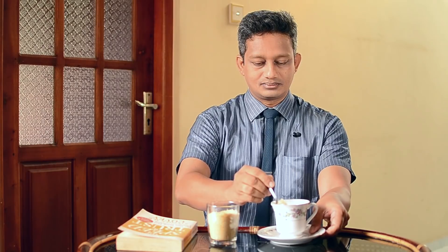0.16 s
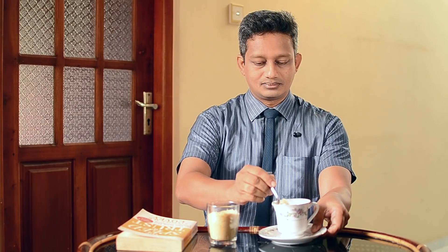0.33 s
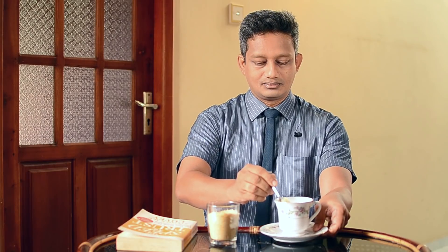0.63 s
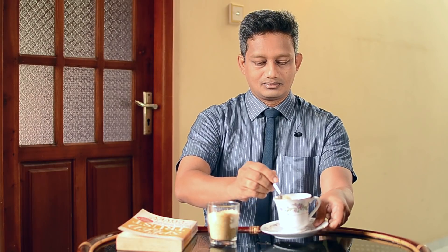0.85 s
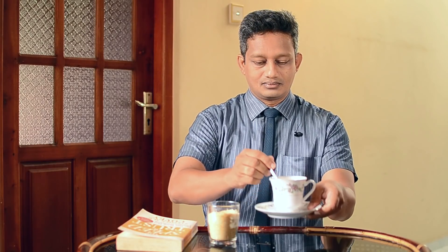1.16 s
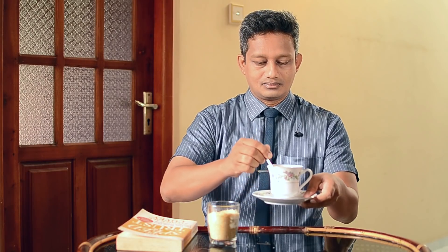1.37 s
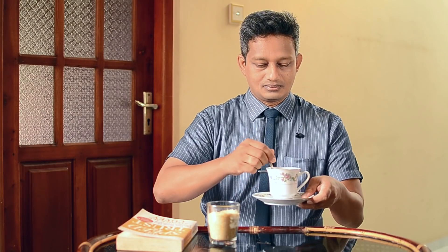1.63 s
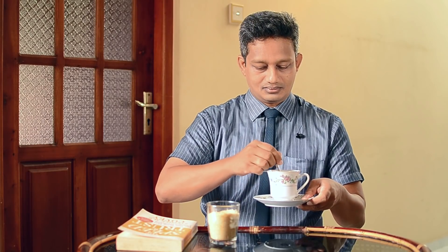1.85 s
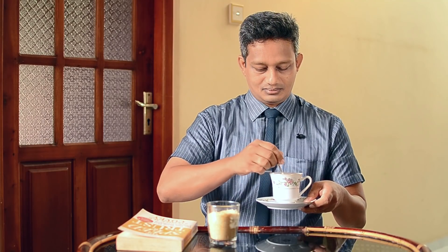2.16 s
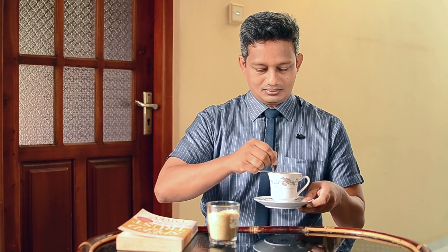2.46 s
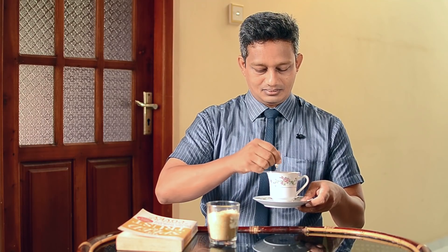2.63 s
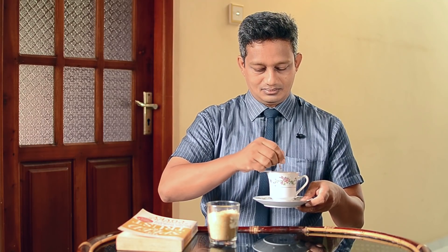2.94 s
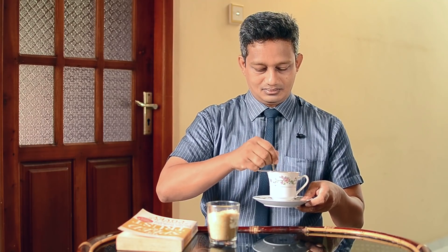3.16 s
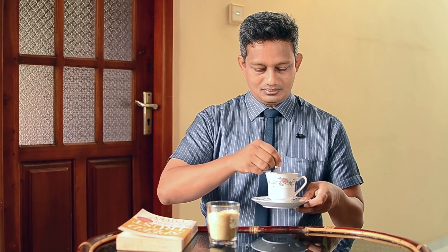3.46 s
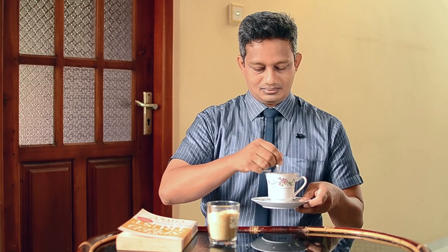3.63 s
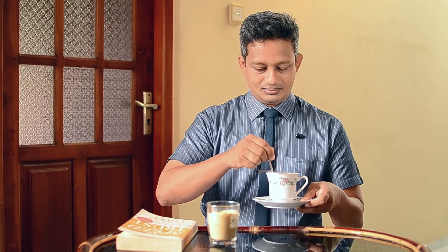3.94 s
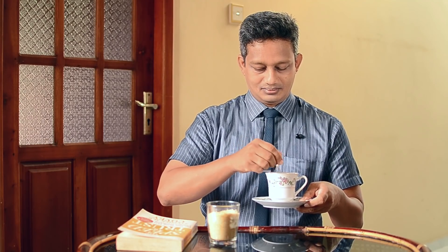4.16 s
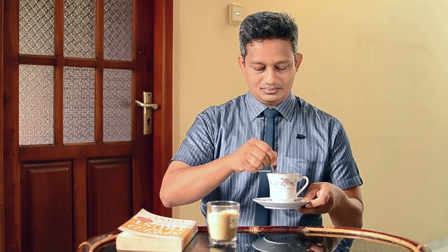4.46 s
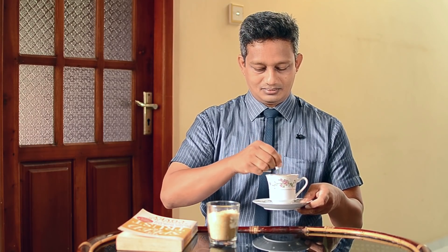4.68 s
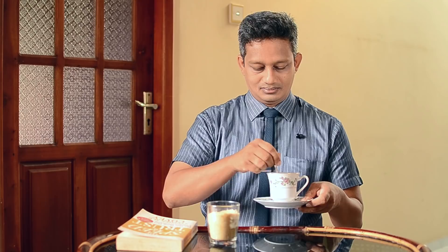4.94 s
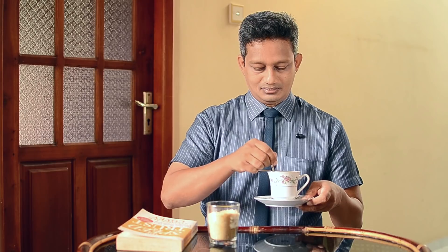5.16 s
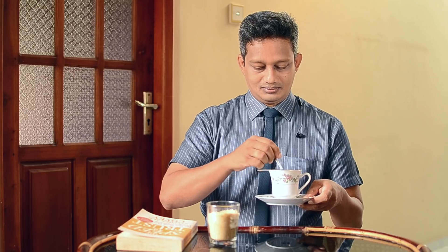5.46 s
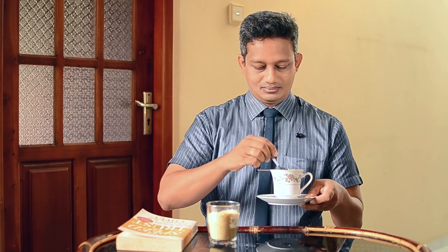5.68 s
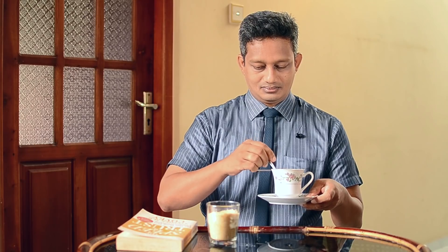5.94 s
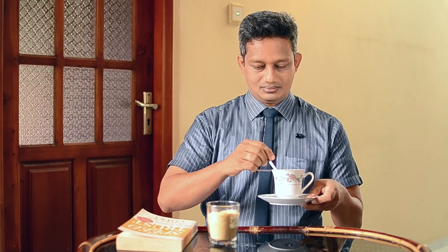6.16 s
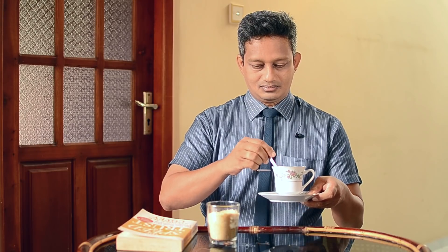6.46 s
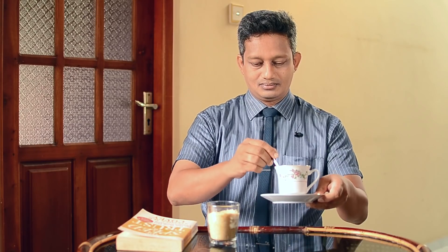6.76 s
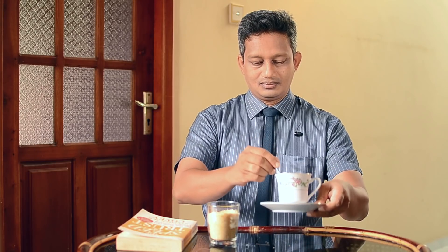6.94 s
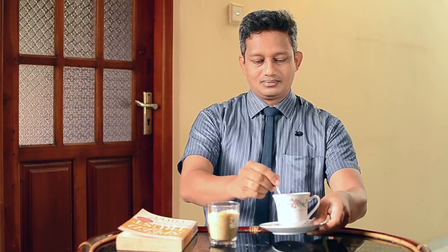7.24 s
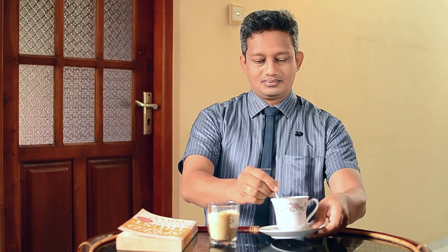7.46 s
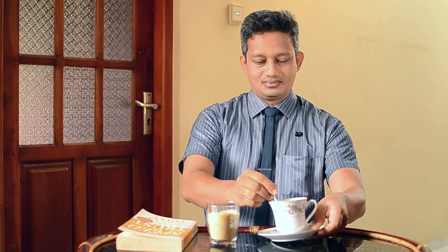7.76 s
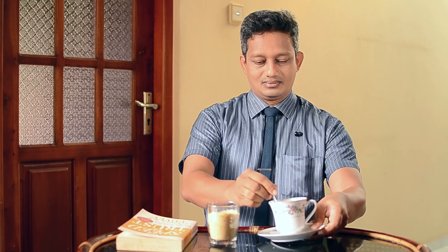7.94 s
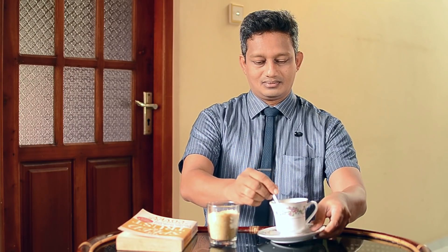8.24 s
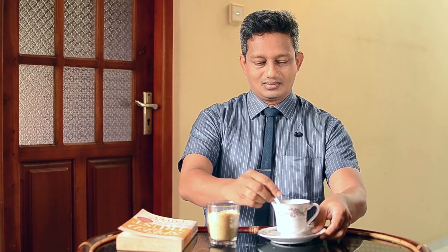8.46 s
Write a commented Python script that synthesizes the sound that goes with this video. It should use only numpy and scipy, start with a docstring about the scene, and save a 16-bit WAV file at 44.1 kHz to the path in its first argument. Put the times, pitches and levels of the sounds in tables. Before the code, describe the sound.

Close clip-on microphone in a small hard-walled room, slightly muffled at the top. Low room noise and faint chirps open, then a metal spoon taps and stirs in a china cup: irregular short rings, soft singing drags, small squeaks. The moving arm adds low, lumpy fabric bumps and rubs. After the strongest ringing clink, the stirring thins out, the saucer lands with one loud hard clack, and the spoon clinks lightly once more.

```python
"""Quiet room noise, faint chirps and soft shirt bumps come first; then a teaspoon stirs tea in a cup.
The steel spoon clinks on the porcelain (struck modes plus a dry tick) and slides along its wall
(noise-driven resonances), with a few squeaks (wobbling sines, like the chirps); near the end
the saucer knocks on the table (cracks plus struck modes). Cloth bumps and rubs a clip-on microphone
as the arm moves (wobbly low tones, dull noise). A small hard-walled room adds decaying reflections."""
import sys
import numpy as np
from scipy import signal
from scipy.fft import rfft, irfft
from scipy.io import wavfile
from scipy.ndimage import uniform_filter1d

SR = 44100
rng = np.random.default_rng(int(sys.argv[2]) if len(sys.argv) > 2 else 0)


def master(y):
    """Save y as 16-bit WAV."""
    cut = np.clip(np.atleast_2d(y).T, -1, 1)
    pcm = np.round(cut * 32767)  # scale
    wavfile.write(sys.argv[1], SR, pcm.astype(np.int16))


N = 379701  # length in samples
LEAD_S = 0.002  # silence ahead of the onset inside each contact burst

# spectrum of cloth on the microphone: pitch_hz [Hz], relative level_db [dB]
CLOTH_COLOUR = [(30, -23.5), (80, -12), (140, 6.5), (260, -7.5), (450, -27), (1000, -33)]


def amp(db):
    """Decibels to gain."""
    return 10 ** (np.asarray(db) / 20)


def unit(x):
    """Scales to rms 1."""
    return x / np.sqrt(np.mean(x ** 2) + 1e-20)


def read(points, hz):
    """Reads a table's value on a log-frequency axis."""
    f, value = np.transpose(points)
    return np.interp(np.log(hz + 1), np.log(f + 1), value)


def add(mix, s, sound):
    """Mixes a sound in at time s, in seconds."""
    part = mix[round(s * SR):][:len(sound)]
    part += sound[:len(part)]


def noise(colour, size):
    """Noise of rms 1 with the given spectrum."""
    hz = np.fft.rfftfreq(size, 1 / SR)
    white = rng.standard_normal(size)
    return unit(irfft(rfft(white) * amp(read(colour, hz)), size))


def smooth_noise(size, width):
    """Slow random drift of rms 1: white noise averaged over width samples."""
    return unit(uniform_filter1d(rng.standard_normal(size), size=width))


def hum(hz, width_hz):
    """A resonance kept ringing by friction, which evens out its swells; rms 1."""
    pole = np.exp((2j * np.pi * hz - np.pi * width_hz) / SR)
    z = signal.lfilter([1], [1, -pole], rng.standard_normal(N))
    return unit(z.real / (abs(z) + 1e-9) ** 0.17)


def ring(modes, t, time=1, grip=1):
    """Struck modes; grip above 1 is a contact that tightens and damps them ever faster."""
    out = np.zeros(len(t))
    for hz, db, t60 in modes:
        decay = np.exp(-np.log(1000) * (t / (t60 * time)) ** grip)
        out += amp(db) * decay * np.sin(2 * np.pi * hz * t)
    return out


def rise(t, rise_s):
    """Soft onset that approaches full level exponentially."""
    return 1 - np.exp(-t / rise_s)


def burst(colour, decay_s):
    """A contact's dense crack with a smooth coloured spectrum, starting LEAD_S in."""
    t = np.arange(4096) / SR - LEAD_S
    hz = np.fft.rfftfreq(4096, 1 / SR)
    shape = (t >= 0) * np.exp(-abs(t) / decay_s)
    z = rfft(rng.standard_normal(len(t)) * shape)
    for _ in range(8):
        z = rfft(irfft(z / abs(z)) * (t >= 0))  # level the spectrum, keep the onset sudden
    fade = np.linspace(2, 0, len(t)).clip(0, 1)
    crack = irfft(z * amp(read(colour, hz))) * fade
    return unit(crack) * np.sqrt(np.mean(shape ** 2))


def swell(t, length, attack_s, release_s, sag_db=0):
    """Attack, a hold that sags by sag_db over the length, release."""
    attack = np.clip(t / attack_s, 0, 1)
    release = np.clip((length - t) / release_s + .5, 0, 1)
    return attack * release * amp(sag_db * np.clip(t / length, 0, 2))


def air():
    """Quiet room noise that swells a little and shifts in small patches, mostly in the midrange."""
    # room noise spectrum: pitch_hz [Hz], relative level_db [dB]
    air_colour = [(15, -68), (25, -14.5), (58, -19.5), (103, -5), (143, 0), (252, -7.5), (290, -8),
                  (334, -8), (413, -7.5), (465, -11.5), (523, -8.5), (1040, -7.5), (1550, -12.5),
                  (2660, -15.5), (7000, -21), (9100, -65), (15400, -120)]
    # how far the patches vary: pitch_hz [Hz], depth_db [dB]
    patch_depth = [(100, 0.57), (1200, 3.0), (2600, 2.3), (6000, .6)]
    hz, _, z = signal.stft(noise(air_colour, N), SR, nperseg=1024)
    patches = uniform_filter1d(rng.standard_normal(z.shape), size=3, axis=0)  # across frequency
    patches = unit(uniform_filter1d(patches, size=7, axis=1))  # across time
    depth_db = read(patch_depth, hz)[:, None]
    patchy = signal.istft(z * amp(depth_db * patches), SR, nperseg=1024)[1][:N]
    level_db = -63 + .5 * smooth_noise(N, 9000)
    return amp(level_db) * unit(patchy)


def chirps_and_squeaks():
    """Brief faint tones of unsteady pitch: early chirps, then squeaks during the stirring."""
    # tones: start_s [s], length_s [s], centre pitch_hz [Hz], level_db [dB, before the trim]
    tones = [(0.114, 0.091, 1350, -55), (0.234, 0.065, 1550, -53), (0.527, 0.12, 1307, -55),
             (2.833, 0.045, 2460, -50.5), (4.024, 0.082, 2022, -44), (4.617, 0.069, 2075, -51)]
    trim_db = -7.5
    out = np.zeros(N)
    for s, length, hz, db in tones:
        size = round(length * SR)
        wobble = smooth_noise(SR, 150)[:size]
        turns = np.cumsum(hz * (1 + 0.033 * wobble)) / SR
        add(out, s, amp(db + trim_db) * np.hanning(size) * np.sin(2 * np.pi * turns))
    return out


def shirt():
    """Cloth nudges the microphone: dull swells of a few uneven cycles, with a short drag."""
    # shirt bumps: start_s [s], overall level_db [dB], centre pitch_hz [Hz]
    bumps = [(0.143, -37, 143), (0.168, -36, 123), (2.274, -31.5, 124), (2.281, -32, 191),
             (3.406, -43.5, 174), (4.685, -32, 227), (4.752, -33, 143), (4.843, -42, 171),
             (5.288, -39.5, 129), (5.677, -37, 151), (5.833, -34, 210), (5.925, -43.5, 133),
             (6.025, -45, 165), (6.176, -33.5, 148), (6.668, -36, 125), (6.701, -35.5, 139),
             (7.539, -44.5, 171)]
    nudge_db, drag_db = -5.5, -16.5  # shares of a bump: the push itself and the cloth's drag after it
    out, t = np.zeros(N), np.arange(SR // 8) / SR
    for s, db, hz in bumps:
        wobble = smooth_noise(len(t), 130)
        turns = np.cumsum(hz * (1 + 0.28 * wobble)) / SR + rng.random()
        u = t / 0.0082  # 1 at the top of the push
        push = (u * np.exp(1 - u)) ** 1.28
        nudge = amp(nudge_db) * push * np.sin(2 * np.pi * turns)
        drag = amp(drag_db) * noise(CLOTH_COLOUR, len(t)) * rise(t, 0.0069) * np.exp(-t / 0.031)
        add(out, s, amp(db) * (nudge + drag))
    low_cut = signal.butter(3, 68, "high", fs=SR, output="sos")
    return signal.sosfilt(low_cut, out)


def clinks():
    """Each touch gives a dry tick and rings cup and spoon, in that touch's own shares."""
    # spoon against cup: start_s [s], contact tick_db [dB], cup's low family low_db [dB],
    # cup's high family high_db [dB], spoon ring spoon_db [dB], cup's cup_t60_s [s]
    touches = [ (1.3642, -36, -47, -57, -25.5, 0.035), (1.3722, -34.5, -49, -60, -57, 0.043),
               (2.4706, -53, -39, -42, -50.5, 0.027), (2.837, -67, -68, -43, -65, 0.058),
               (2.853, -70, -60, -32, -68, 0.028), (3.238, -50.5, -40.5, -50.5, -56, 0.039),
               (3.9512, -49, -35, -33, -47, 0.039), (4.5247, -39.5, -31.5, -37.5, -38.5, 0.037),
               (5.1, -43.5, -39.5, -28.5, -59, 0.045), (5.9492, -50, -35.5, -37.5, -58, 0.091),
               (6.068, -57, -50.5, -50.5, -50, 0.053), (6.1968, -33.5, -20, -22, -34, 0.047),
               (6.2074, -36, -57, -27, -35, 0.044), (6.6061, -49, -39, -47.5, -47, 0.14),
               (6.911, -50.5, -51.5, -79, -39.5, 0.079), (8.4449, -50, -54, -46, -33, 0.053)]
    # the cup's two families of modes: pitch_hz [Hz], level_db [dB], ring time [factor on cup_t60_s]
    cup_low, cup_high = [(1877, 0, 1), (1908, -23, 3.5), (1020, -23, 1), (1975, -20, .7), (2400, -30, .6),
                         (6650, -26, 1), (6740, -30, 1.7)], [(4872, 0, 1), (4850, -22, 3), (4180, -20, 1), (4570, -23, 1.2),
                                          (4985, -13, .7), (5110, -16, .7), (5950, -17, .6)]
    # the spoon's modes: pitch_hz [Hz], level_db [dB], t60_s [s]
    spoon = [(1000, -26, .14), (1810, -20, .04), (1985, -28, .12), (3380, -20, .03), (3690, -19, .04),
             (3940, -18, .03), (4080, -20, .07), (4540, -31, .3), (5430, -18, .06), (5590, 0, .036),
             (5650, -11, .04), (5920, -21, .04)]
    # contact tick spectrum: pitch_hz [Hz], relative level_db [dB]
    tick_colour = [(200, -50), (700, -15.5), (1000, 2.5), (1400, -15), (2050, 4.5), (2700, -4.5),
                   (3350, -7), (4200, 2.5), (5100, -2), (5650, 0.5), (6350, -0.5), (6750, -15.5),
                   (7300, -14.5)]
    # the hold of the fingers shifts every ring a little: time_s [s], pitch [factor]
    hold = [(1.4, 1.018), (2.4, 1.002), (4, 1.002), (5.1, .993), (5.9, 1)]
    # the spoon stays against the wall and chokes each ring
    low_grip, high_grip, spoon_grip = 1.92, 1.46, 1.15
    cup_rise_s, spoon_rise_s, tick_decay_s = 0.0025, 0.0012, 0.0047
    porcelain, steel, ticks = np.zeros((3, N))
    t = np.arange(SR // 2) / SR
    for s, tick_db, low_db, high_db, spoon_db, cup_t60 in touches:
        pitched_t = t * np.interp(s, *np.transpose(hold))  # faster time raises the pitch
        low = amp(low_db) * ring(cup_low, pitched_t, cup_t60, grip=low_grip)
        high = amp(high_db) * ring(cup_high, pitched_t, cup_t60, grip=high_grip)
        spoon_ring = amp(spoon_db) * ring(spoon, pitched_t, grip=spoon_grip)
        add(porcelain, s, (low + high) * rise(t, cup_rise_s))
        add(steel, s, spoon_ring * rise(t, spoon_rise_s))
        add(ticks, s - LEAD_S, amp(tick_db) * burst(tick_colour, tick_decay_s))
    return porcelain, steel, ticks


def rubs():
    """The shirt drags over the microphone while the arm shifts: a dull, lumpy rumble."""
    # rubs: start_s [s], length_s [s], level_db [dB]
    rub_events = [(2.238, 0.1, -56), (4.596, 0.3, -53.5), (5.689, 0.134, -53.5), (6.17, 0.059, -52)]
    edge_s, lump_s, lumpy_db = 0.019, 0.022, -0.5  # a rub fades in and out, and sticks in lumps
    t = np.arange(N) / SR
    lumps = smooth_noise(N, round(lump_s * SR))
    pressure = sum(amp(db) * swell(t - s, length, edge_s, edge_s) for s, length, db in rub_events)
    return pressure * amp(lumpy_db * lumps) * noise(CLOTH_COLOUR, N)


def slides():
    """The spoon catches the wall and drags along it; friction keeps both bodies singing faintly."""
    # slides: start_s [s], length_s [s], cup ring cup_db [dB], spoon's bending_db [dB],
    # spoon's high ring bowl_db [dB]
    drags = [ (2.552, 0.063, -64, -78, -85), (2.781, 0.1, -57, -77, -70), (3.05, 0.029, -60, -80, -82),
             (3.677, 0.041, -65, -78, -92), (3.748, 0.082, -63.5, -82, -88),
             (4.051, 0.092, -50.5, -74, -58), (4.168, 0.11, -74, -78, -65),
             (4.283, 0.12, -54.5, -61.5, -69), (4.621, 0.073, -56.5, -73, -67),
             (4.837, 0.13, -50.5, -60, -77), (6.289, 0.1, -53, -62.5, -75), (6.801, 0.16, -61, -72, -72)]
    catch_s, let_go_s = 0.015, 0.022  # the pressure builds quickly, sags, then lets go
    sag_db, bowl_sag_db = -9, -18.5  # the spoon's high ring fades faster than the cup
    bend_lead_s = 0.068  # the spoon bends and shudders this long before the cup takes up the note
    t, out = np.arange(N) / SR, np.zeros(N)
    cup = hum(1865, 11.4) + amp(-22) * hum(4880, 50)
    bending = hum(1050, 75)
    bowl = hum(5600, 120) + amp(-4) * hum(4520, 150)
    for s, length, cup_db, bending_db, bowl_db in drags:
        near = abs(t - s) < .5
        since = t[near] - s
        pressure = swell(since, length, catch_s, let_go_s, sag_db)
        early_pressure = swell(since + bend_lead_s, length, catch_s, let_go_s, sag_db)
        bowl_pressure = swell(since, length, catch_s, let_go_s, bowl_sag_db)
        out[near] += amp(cup_db) * cup[near] * pressure
        out[near] += amp(bending_db) * bending[near] * early_pressure
        out[near] += amp(bowl_db) * bowl[near] * bowl_pressure
    return out


def saucer():
    """The saucer lands in quick contacts, each a crack and a ring that the table stops."""
    # saucer on the table, rim then foot: start_s [s], crack_db [dB], ring_db [dB]
    contacts = [(7.8392, -25, -50), (7.8422, -29.5, -18)]
    # the saucer's modes: pitch_hz [Hz], level_db [dB], t60_s [s]
    saucer_modes = [(335, -27, .09), (530, -24, .08), (897, -10, .09), (1662, -21, .06), (1984, -13, .05),
                    (2043, 0, .026), (2350, -20, .08), (2618, -14, .06), (2723, -12, .06), (2895, -11, .04),
                    (3032, -12, .045), (3330, -13, .025), (3650, -17, .03), (4005, -20, .09)]
    # crack spectrum: pitch_hz [Hz], relative level_db [dB]
    crack_colour = [(60, -49), (190, -25.5), (310, -5.5), (450, -8), (650, 2.5), (900, -3.5), (1250, -4),
                    (1700, 1.5), (2300, 4.5), (3100, -3), (4000, -6), (4400, -15.5), (5800, -13),
                    (7000, -28)]
    cracks, rings = np.zeros((2, N))
    t = np.arange(SR // 2) / SR
    for s, crack_db, ring_db in contacts:
        add(cracks, s - LEAD_S, amp(crack_db) * burst(crack_colour, decay_s=0.0051))
        add(rings, s, amp(ring_db) * ring(saucer_modes, t) * rise(t, 0.00071))
    return cracks, rings


def room(x):
    """Dense reflections of random sign, each band dying at its own speed."""
    # room decay: pitch_hz [Hz], t60_s [s]
    room_decay = [(200, 0.43), (900, 0.52), (2000, 0.46), (4000, 0.49), (7000, 0.42)]
    t = np.arange(SR) / SR
    taps = rng.choice([-1, 1], SR) * (1 - np.exp(-(t / 0.0061) ** 2))
    hz, when, z = signal.stft(taps, SR, nperseg=256)
    fade = np.exp(-np.log(1000) * when / read(room_decay, hz)[:, None])
    tail = signal.istft(z * fade, SR, nperseg=256)[1]
    return signal.fftconvolve(x, tail / np.linalg.norm(tail))[:N]


def scene():
    """Mixes dry sources with their room sends; the saucer's crack sends the most to the room."""
    porcelain, steel, ticks = clinks()
    cracks, rings = saucer()
    faint_tones = slides() + chirps_and_squeaks()
    direct = porcelain + steel + ticks + faint_tones + cracks + rings
    wet = amp(-11.5) * porcelain + amp(-11.0) * (steel + ticks) + amp(-12.5) * faint_tones
    wet += amp(1.5) * cracks + amp(-13.5) * rings
    return (direct + room(wet) + shirt() + rubs() + air())[None]


def record(dry):
    """A narrow-band recorder with a very faint electronic hiss."""
    # hiss spectrum: pitch_hz [Hz], relative level_db [dB]
    hiss_colour = [(11700, 7.5), (12100, -12.5), (15500, 1.5), (16200, -32)]
    edge_hz, hiss_db = 7300, -92.5
    low_pass = signal.firwin(241, edge_hz, window=("kaiser", 7), fs=SR)
    narrow = signal.oaconvolve(dry, low_pass[None], "same")
    return narrow + amp(hiss_db) * noise(hiss_colour, N)


dry = scene()
out = record(dry)
master(out)
```